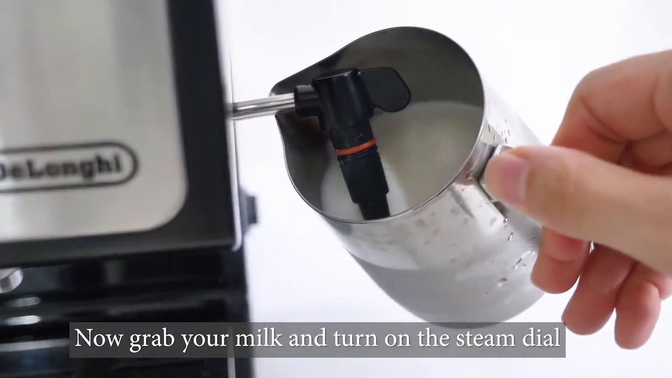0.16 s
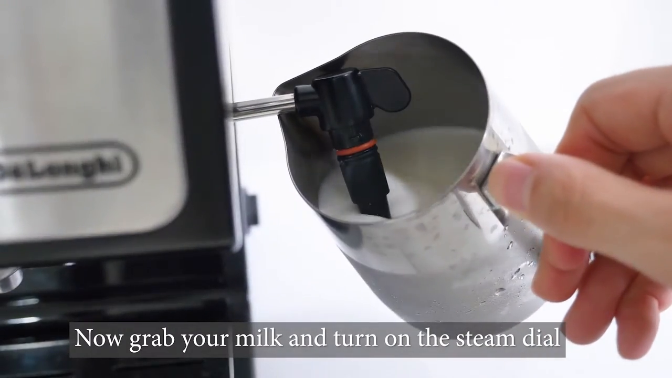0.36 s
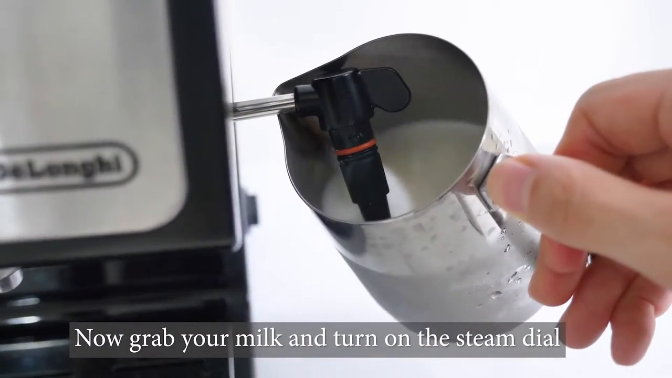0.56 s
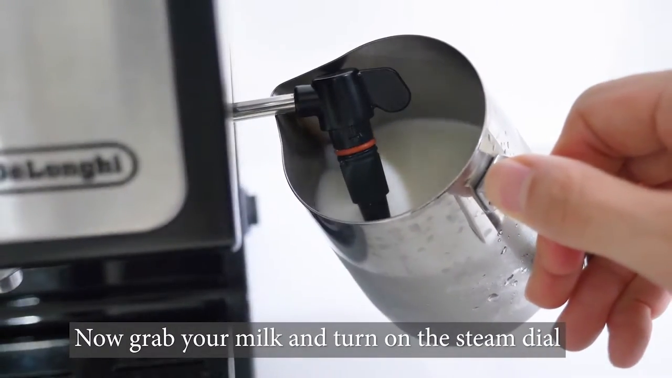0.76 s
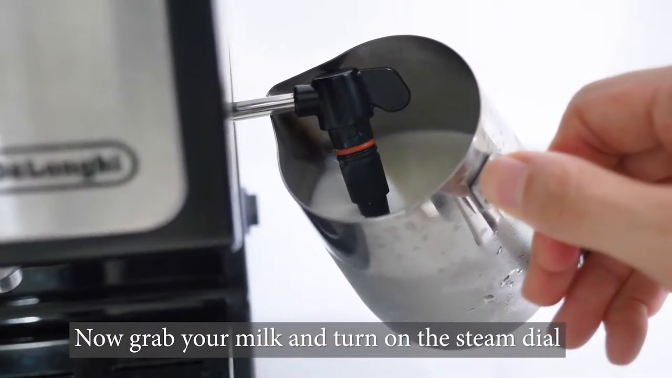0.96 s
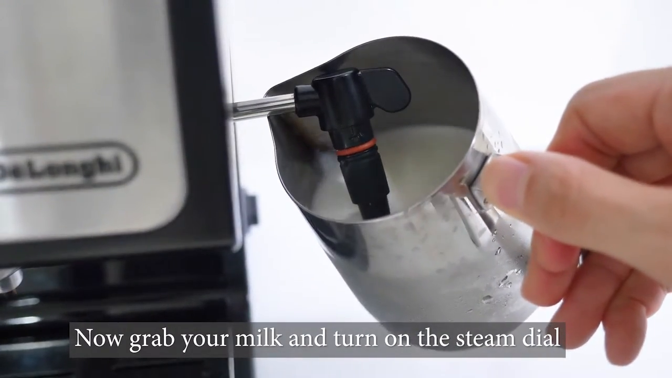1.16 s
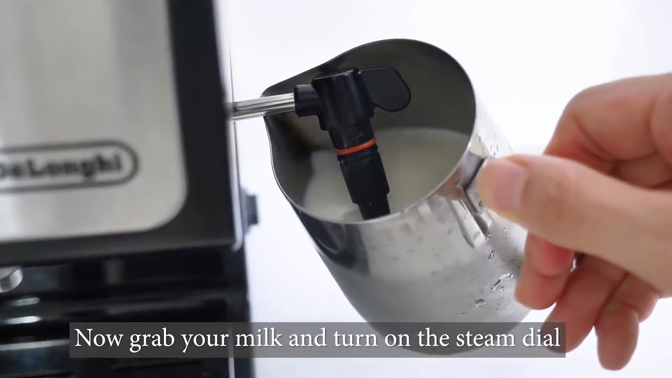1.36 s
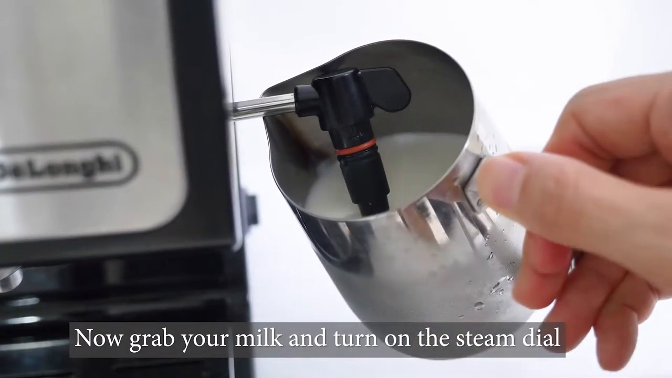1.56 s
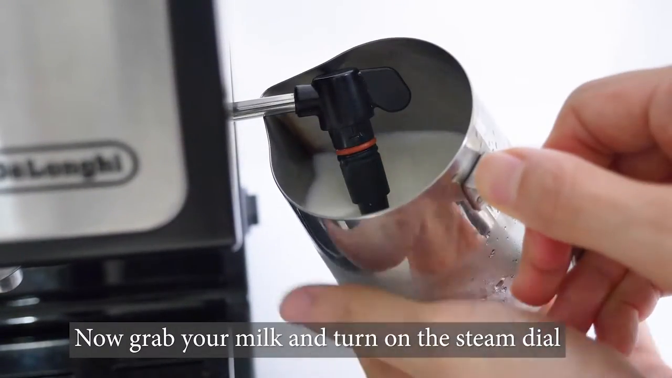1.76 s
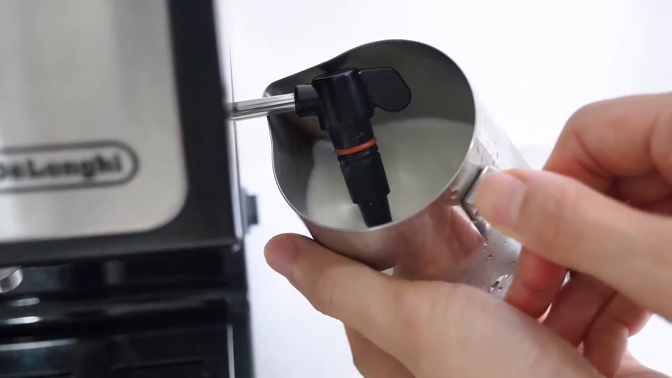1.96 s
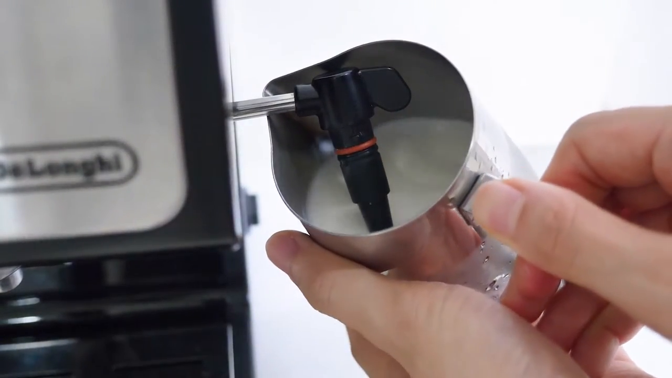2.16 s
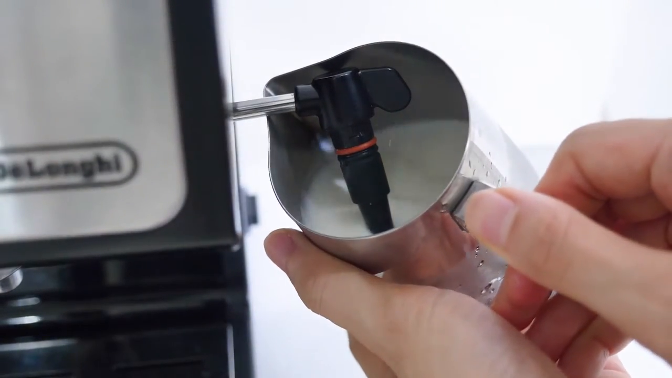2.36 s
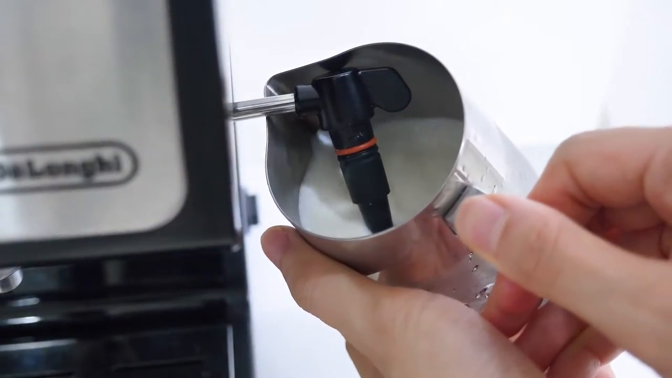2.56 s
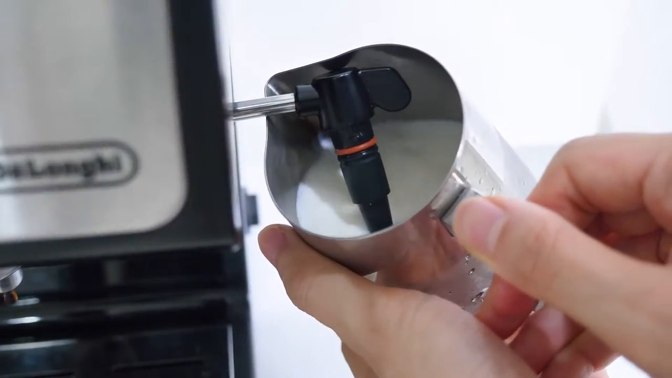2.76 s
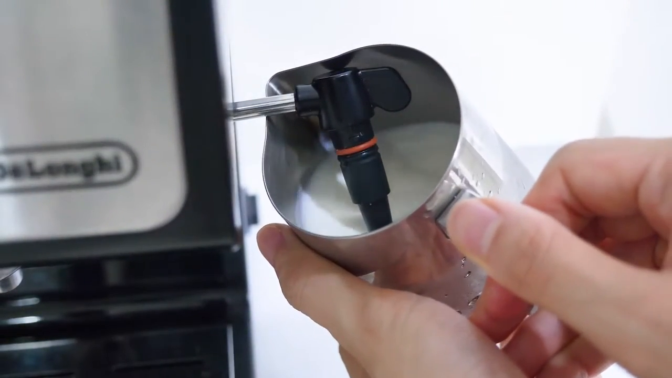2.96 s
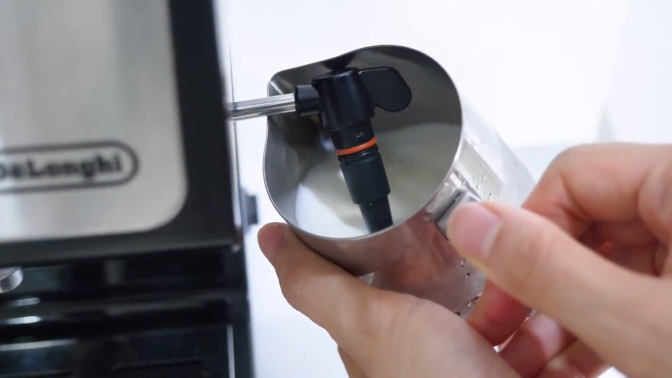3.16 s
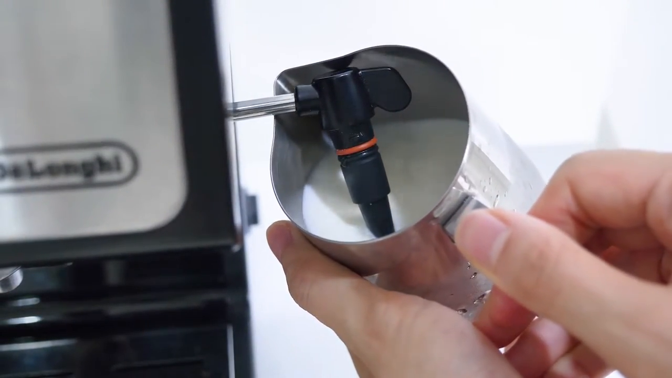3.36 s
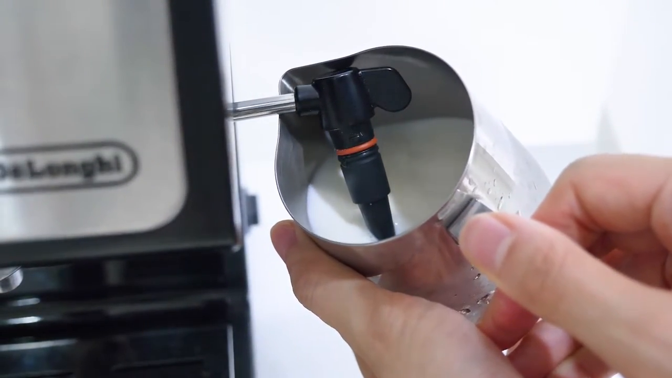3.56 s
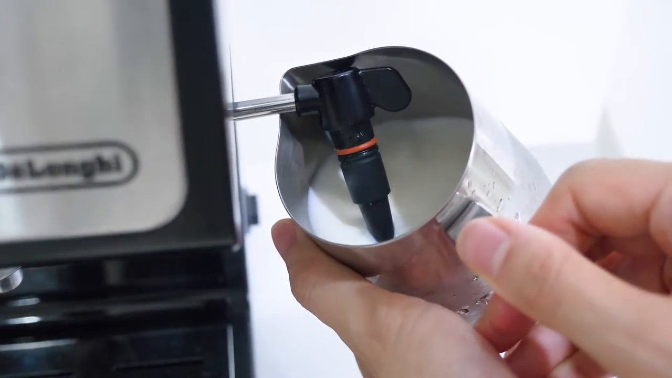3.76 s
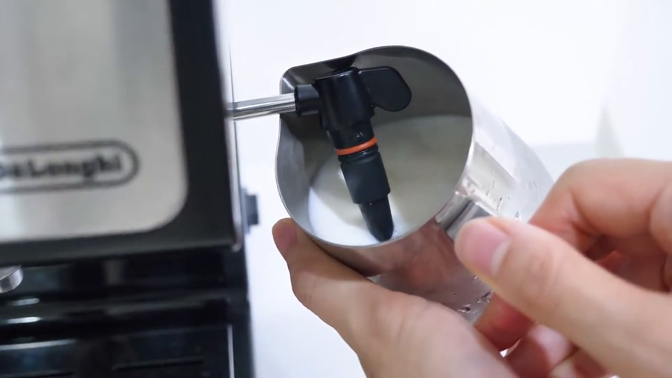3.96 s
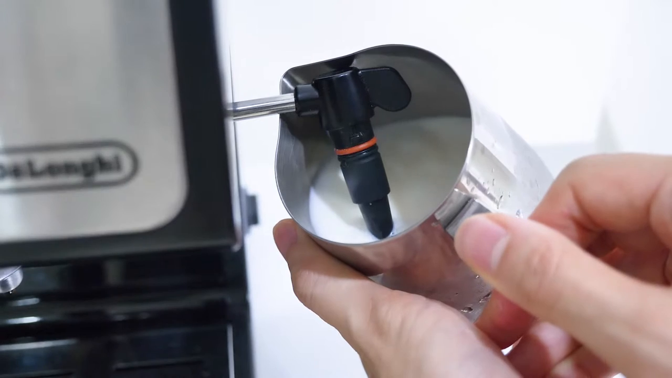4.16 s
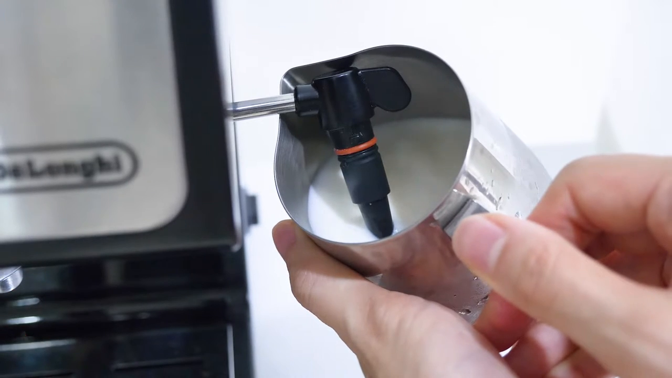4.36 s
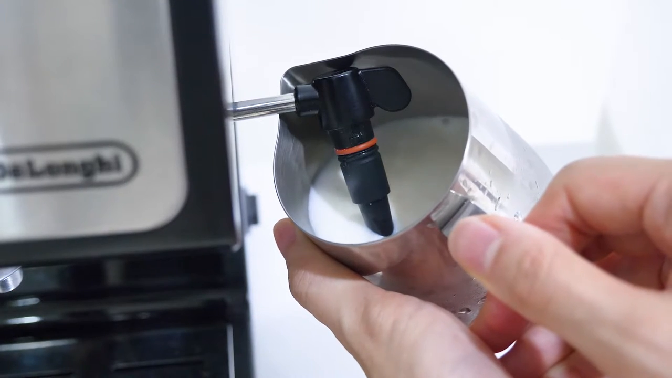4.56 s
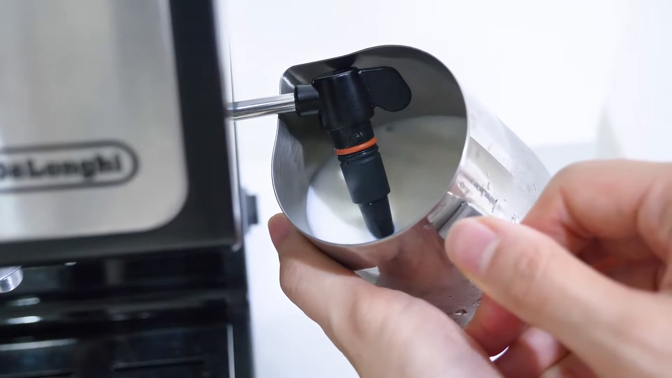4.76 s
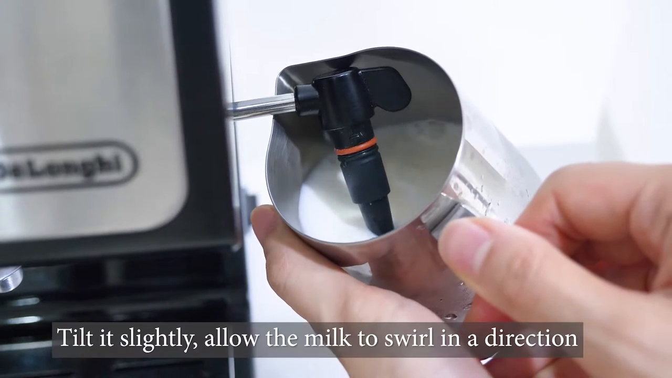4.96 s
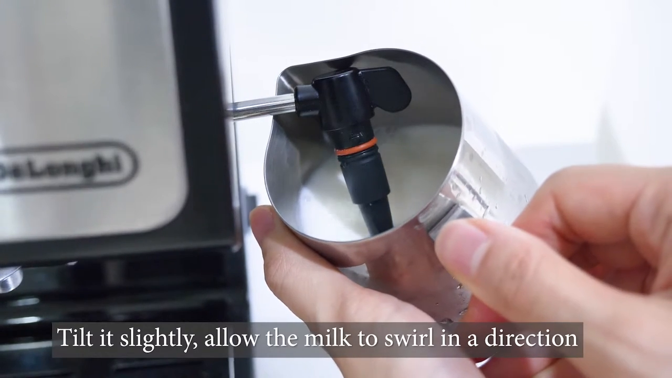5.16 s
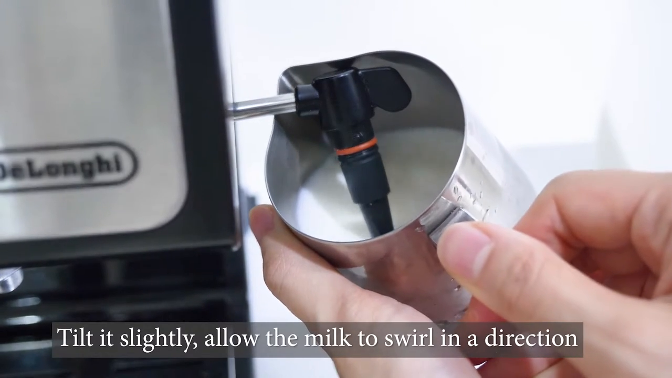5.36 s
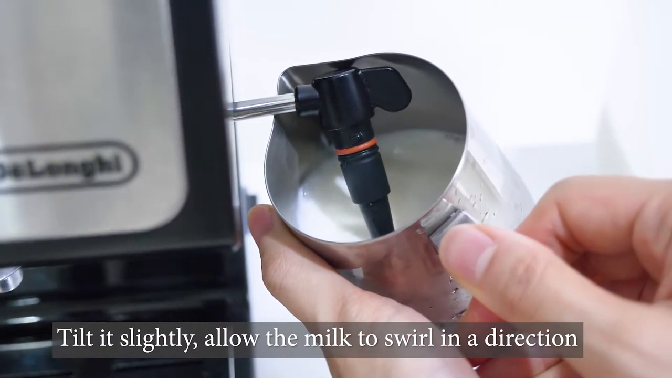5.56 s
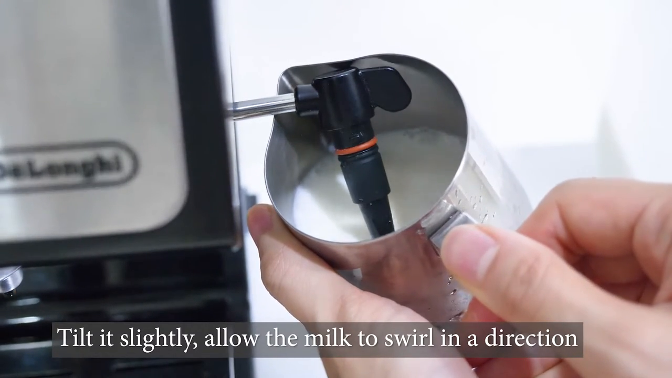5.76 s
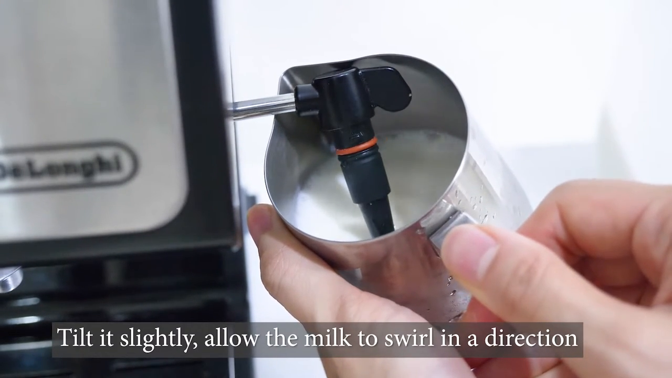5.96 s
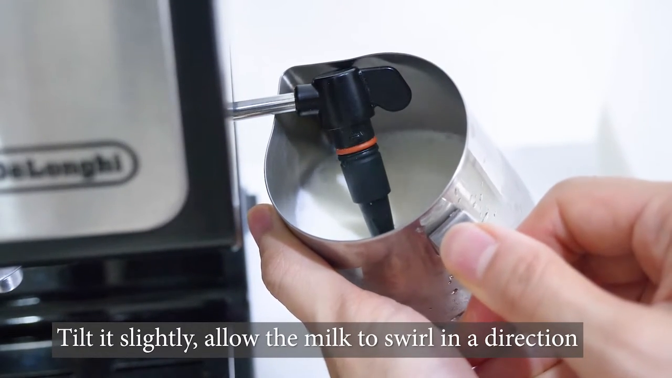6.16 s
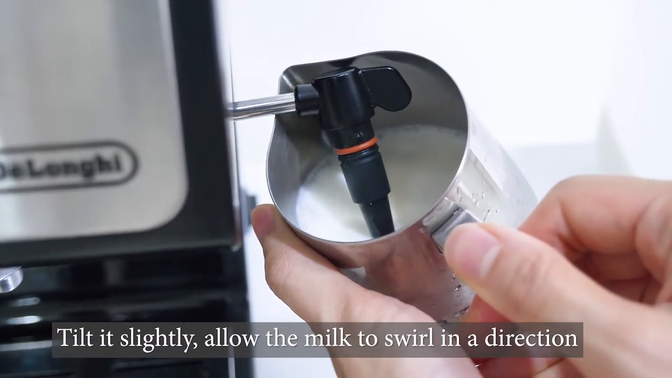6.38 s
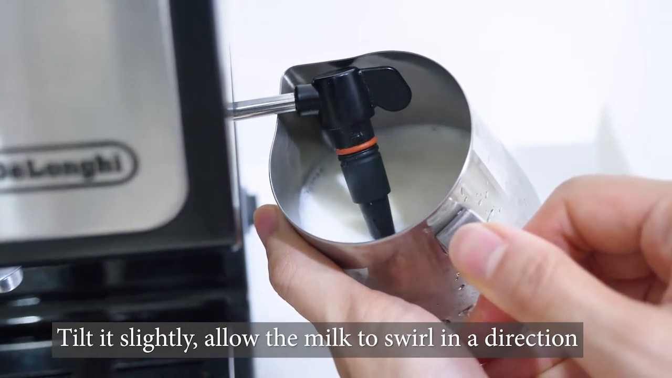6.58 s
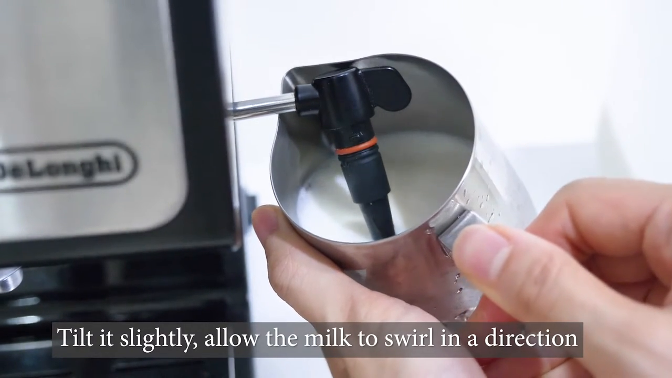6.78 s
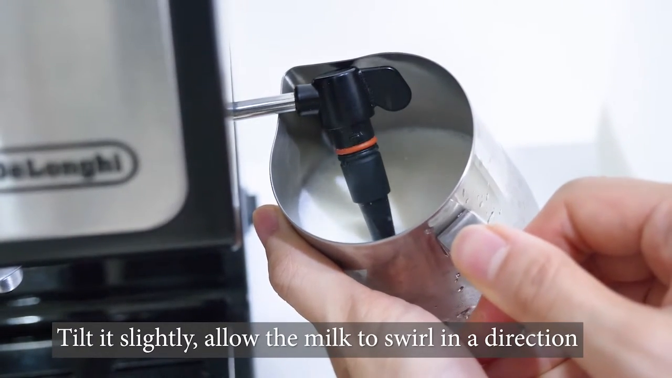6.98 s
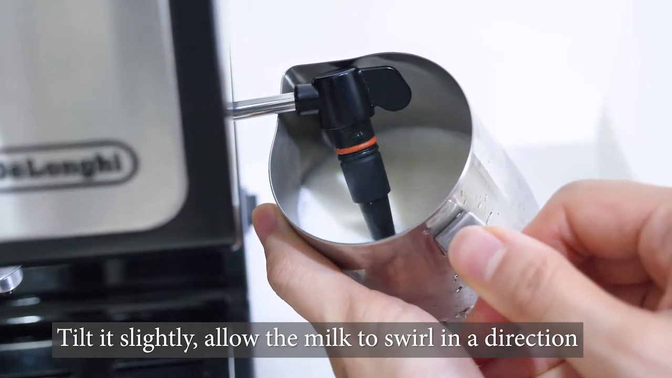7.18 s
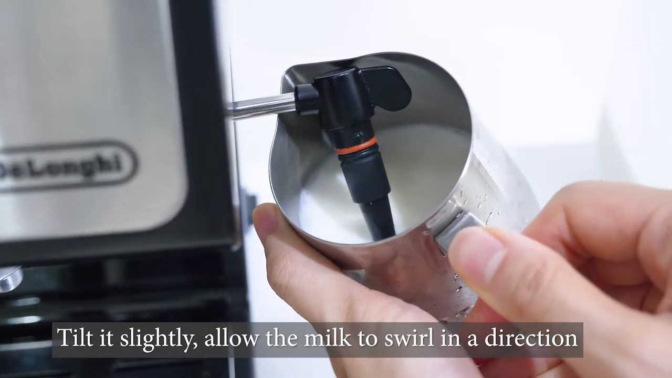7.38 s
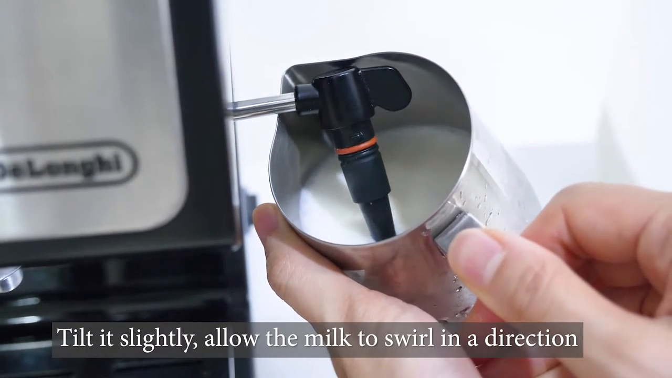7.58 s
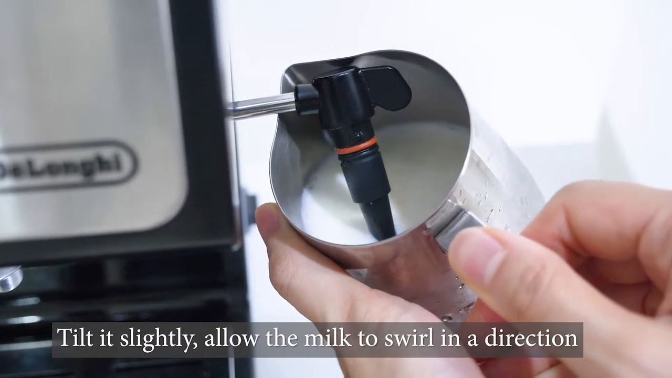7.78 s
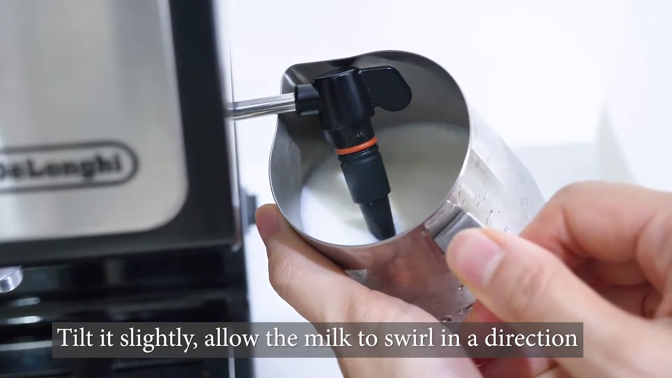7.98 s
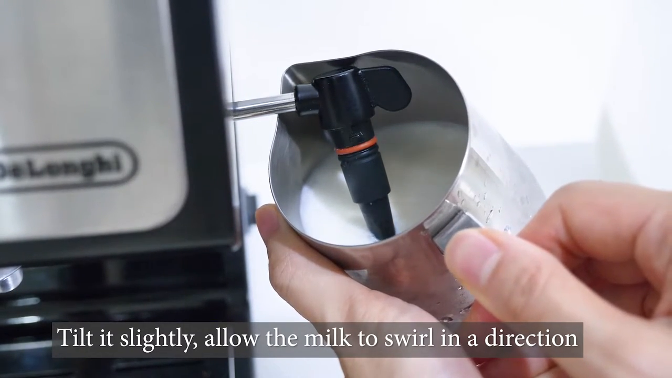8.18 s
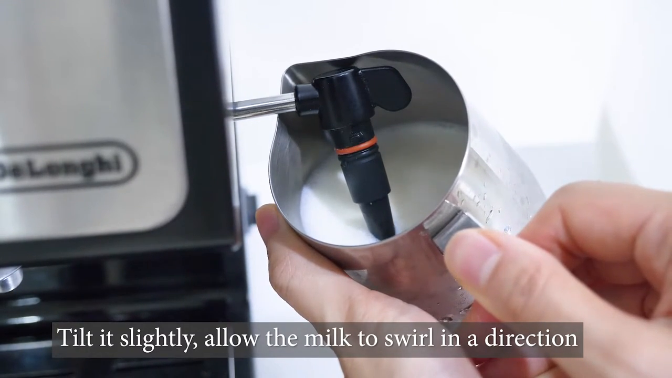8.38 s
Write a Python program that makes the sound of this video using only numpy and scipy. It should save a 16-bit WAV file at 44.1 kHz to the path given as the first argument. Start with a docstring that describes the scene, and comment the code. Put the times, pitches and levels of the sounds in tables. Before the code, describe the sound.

Close up in a small kitchen, a steel milk pitcher rubs softly in the hand and the wand ticks over low machine hum. Steam pockets crack and thud, quickening, until a loud tearing hiss starts at about one second. It sings with gliding tones, runs steadily, then briefly thins into bright spray and turns rougher, gurgling and chugging to the end.

```python
"""The steam wand of an espresso machine froths milk in a steel pitcher, close to the microphone in a small kitchen.
The jet is a loud, tearing hiss: noise and bubble clicks shaped by milk, pitcher and a gliding steam pocket.
Just before it, pockets of steam collapse with a crack and a thud, made of noise bursts and ringing sines.
Now and then the tip comes bare and sprays; later the pitcher is tilted, the tip rides shallower and the jet chugs.
Behind it: a rub of the pitcher, ticks of the wand, filtered-noise hum and a short diffuse room tail."""
import sys
import numpy as np
from scipy import signal
from scipy.fft import rfft, irfft, next_fast_len
from scipy.io import wavfile

SR = 44100
rng = np.random.default_rng(int(sys.argv[2]) if len(sys.argv) > 2 else 0)


def output_pcm(signal):
    """Save a mono or channel-first signal as 16-bit PCM at the path in sys.argv[1].

    Samples are clipped to [-1, 1] before scaling.
    """
    pcm = np.clip(np.atleast_2d(signal).T, -1, 1) * 32767
    wavfile.write(sys.argv[1], SR, np.round(pcm).astype(np.int16))


N = 371763
TIME = np.arange(N) / SR
JET_START = .957  # s
# how shallow the tip rides as the pitcher is tilted: (t/s, share 0-1)
SHALLOW = [(5.2, 0.06), (6.3, 0.75)]


def gain_of(db):
    """Decibels to amplitude."""
    return 10 ** (np.asarray(db) / 20)


def evened(x):
    """Scales to rms 1."""
    return x / np.sqrt(np.mean(x ** 2) + 1e-20)


def read(points, hz):
    """A spectrum, joined by straight lines over log frequency."""
    f, value = np.transpose(points)
    return np.interp(np.log(hz + 1), np.log(f + 1), value)


def follow(rows, t):
    """Each column of a curve at the times t."""
    s, *columns = np.transpose(rows)
    return [np.interp(t, s, c) for c in columns]


def add(mix, s, sound):
    """Mixes a sound in at time s."""
    part = mix[max(round(s * SR), 0):][:len(sound)]
    part += sound[:len(part)]


def hump(hz, centre, width):
    """Bell of one resonance, height 1."""
    return 1 / (1 + (2 * (hz - centre) / width) ** 2)


def noise(colour, size):
    """Noise of a given spectrum, rms 1."""
    shape = gain_of(read(colour, np.fft.rfftfreq(size, 1 / SR)))
    return evened(np.fft.irfft(rfft(rng.standard_normal(size)) * shape, size))


def wander(rate_hz):
    """Smooth chance up to about rate_hz, rms 1."""
    hz = np.fft.rfftfreq(N, 1 / SR)
    return evened(irfft(rfft(rng.standard_normal(N)) / (1 + (hz / rate_hz) ** 4) ** .5, N))


def flutter(depth_db, rate_hz):
    """A random gain of steady mean power."""
    depth = depth_db * np.log(10) / 20
    return np.exp(depth * wander(rate_hz) - depth ** 2)


def swirl(shape, bins, frames):
    """Random patches over frequency and time, rms 1."""
    patch = np.outer(np.hanning(bins), np.hanning(frames))
    return evened(signal.fftconvolve(rng.standard_normal(shape), patch, "same"))


def short_spectra(x):
    """Frequencies, frame times and short-time spectra."""
    return signal.stft(x, SR, nperseg=1024, noverlap=896)


def jet():
    """Large bubbles pop, the pocket chugs and small bubbles fizz; their common surge grows as the tip rides shallow."""
    shallow = np.clip(follow(SHALLOW, TIME)[0], 0, 1)
    surge = flutter(depth_db=0.26 + 0.35 * shallow, rate_hz=38)
    pops = evened(collapses(per_s=900, spread_db=1.5) + 0.94 * rng.standard_normal(N))

    chugging = np.clip(.1 + .15 * shallow + .11 * spurts(TIME)[0], 0, 1)
    bursts = evened(1 - chugging + chugging * chug(rate_hz=112, jitter=.35, decay=.42))
    boil = bursts * evened(collapses(per_s=4000, spread_db=0.5) + 0.46 * rng.standard_normal(N))

    fizz = evened(collapses(per_s=3500, spread_db=0.5) + 1.2 * rng.standard_normal(N))
    fizz = fizz * flutter(depth_db=0.79 + 1.4 * shallow, rate_hz=23)

    # pops fill the bass, boil the middle, fizz the treble; the shares of power add up to 1
    hz, t, z = short_spectra(np.array([pops, boil, fizz]) * surge)
    large = np.clip(read([(1700, 1), (2700, 0.02)], hz), 0, 1)[:, None]
    small = np.clip(read([(3800, 0.011), (5500, 1)], hz), 0, 1)[:, None]
    middle = np.clip(1 - large - small, 0, 1)
    drive = np.sqrt(large) * z[0] + np.sqrt(middle) * z[1] + np.sqrt(small) * z[2]

    # swirling foam opens and closes paths for the sound: patches in time and frequency
    swirl_db = 1.69 * swirl(drive.shape, bins=15, frames=31)
    ripple_db = read([(1500, 2.25), (3500, 0.99), (6000, 3.3), (12000, 3.15)], hz)[:, None]
    colour = jet_colour(hz, t) + swirl_db + ripple_db * fine_modes(hz, t)
    sound = signal.istft(drive * gain_of(colour), nperseg=1024, noverlap=896)[1][:N]
    return sound * np.clip((TIME - JET_START) / 0.0044, 0, 1)


def collapses(per_s, spread_db):
    """Clicks of imploding bubbles, most small and a few large, rms 1."""
    size = gain_of(spread_db * np.minimum(rng.exponential(1, N), 4))
    return evened(size * rng.choice([-1., 1.], N) * (rng.random(N) < per_s / SR))


def chug(rate_hz, jitter, decay):
    """The pocket collapses at an uneven rate; each collapse is a burst that decays over a share of its turn."""
    turns = np.cumsum(rate_hz * np.exp(jitter * wander(60))) / SR
    return evened(np.exp(-(turns % 1) / decay))


def jet_colour(hz, t):
    """Gain in dB (frequency x time) that milk, steam pocket and pitcher give to the jet."""
    # steam condensing in milk: (f/Hz, relative level/dB per Hz)
    boil_colour = [(210.0, -28.5), (300.0, -34), (520.0, -11.5), (660.0, -26.5), (820.0, -19),
                   (1000.0, -3.5), (1750.0, -7.5), (2700.0, 1.45), (3200.0, 4), (5500.0, -3.5),
                   (9500.0, -5), (13000.0, -19.5), (15500.0, -30.5)]
    # fine mist, heard at the very top: (t/s, level/dB)
    mist_level = [(1.25, 15), (2.2, 6), (2.75, 11), (3.2, 3.5), (4.4, 10), (6.05, 3), (6.7, -11),
                  (7.1, -1.5), (8.43, -5)]
    hz = hz[:, None]
    (mist,), (shallow,) = follow(mist_level, t), follow(SHALLOW, t)
    strength, gurgle, fizz = flow(t, shallow)
    # the smaller the bubble, the higher it sounds
    bubbles = gurgle * read([(1000, 1), (2600, 0)], hz)
    bubbles = bubbles + fizz * read([(3500, 0), (6500, 1)], hz)
    bubbles = bubbles + mist * read([(7000, 0), (14000, 1)], hz)
    # a spurt changes the band round 2950 Hz and the hiss above it
    throb, hiss = spurts(t)
    spurt = (throb - 1.34 * shallow) * hump(hz, 2950, 410) + hiss * read([(3200, 0.73), (4000, 1)], hz)
    no_bass = read([(40, -23), (200, -1)], hz)
    base_db = -18.5
    body = base_db + strength + read(boil_colour, hz) + pitcher_ring(hz, shallow) + bubbles + spurt
    return body + steam_pocket(hz, t, shallow) + spray(hz, t) + hollows(hz, t) + no_bass


def steam_pocket(hz, t, shallow):
    """The pocket at the tip sings in two gliding modes, in dB; a bare tip loses it and it takes a while to regrow."""
    # (t/s, resonance f/Hz, strength of the song/dB before gulps, baring and the factor below)
    song_curve = [(1.15, 1250, -2.5), (1.46, 1650, -9), (1.56, 1850, 13), (1.68, 2150, 13),
                  (1.93, 2450, 11), (2.02, 2900, 2), (2.15, 4250, 7.5), (2.32, 4030, 3.5),
                  (2.55, 2900, 2.5), (2.93, 2500, 10), (3.06, 2120, 16), (3.24, 2000, 2), (3.68, 2100, 1.5),
                  (3.78, 3100, 5), (4.7, 2520, 5), (5.1, 2540, 2), (5.3, 2150, 8.5), (5.6, 2300, 1)]
    width, second_ratio = 0.13, 2.27  # both as shares of the pocket's pitch
    pocket_hz, song = follow(song_curve, t)
    song = song + shallow * gulps(t) - 5.5 * barings(t, close_s=0.11)
    # the second mode rings most clearly while the jet opens
    second = (1 - shallow) * 1.5 + 7 * opening(t)
    return 1.04 * song * hump(hz / pocket_hz, 0.99, width) + second * hump(hz / pocket_hz, second_ratio, width)


def pitcher_ring(hz, shallow):
    """Air and wall resonances of the pitcher in dB, blended from the tip deep to the tip shallow."""
    # (f/Hz, width/Hz, level/dB with the tip deep, level/dB with the tip shallow)
    pitcher_modes = [(1065, 116, 3, 9), (1224, 104, 10.5, 7), (1444, 90, 10, 13.5), (1560, 88, 8, 12.5),
                     (1871, 65, 15, 8.5), (2098, 114, 8.5, 3.5), (2400, 86, -4.4, 2), (2470, 67, 12, 9),
                     (2640, 42, 1.5, 12.5), (2925, 161, 5.5, 13.5), (3074, 117, 11.5, 15),
                     (3325, 173, 9.5, 7.5), (3470, 73, -1, 11), (3567, 69, 9.5, 12.5), (3970, 136, 12, 6),
                     (4217, 117, 6.5, 10), (4446, 256, 1.5, 10.5), (4804, 220, 10.5, -3),
                     (5415, 170, 6, 13.5), (5830, 210, 2.5, 6.5), (6700, 180, 4, -4.5),
                     (7300, 114, 5.5, 1.5), (7770, 270, 3.2, -6.5), (8370, 560, 0.5, 8),
                     (8670, 450.0, 2.5, -5.5), (10100, 920, -1.3, 2.5), (12460, 500, 0.5, 4)]
    deep_ring = sum(db * hump(hz, f, width) for f, width, db, _ in pitcher_modes)
    shallow_ring = sum(db * hump(hz, f, width) for f, width, _, db in pitcher_modes)
    return (1 - shallow) * deep_ring + shallow * shallow_ring


def flow(t, shallow):
    """Strength of the jet, gurgle of large bubbles and fizz of small ones in dB, from opening, tilt and gulps."""
    spare, gulp = opening(t), gulps(t)
    strength = 0.5 - 3 * shallow + 3 * spare - 0.35 * gulp
    gurgle = -0.54 + 2.8 * shallow + gulp
    fizz = -0.26 + 3.5 * shallow - 7.5 * spare + 0.59 * gulp
    return strength, gurgle, fizz


def opening(t):
    """Spare pressure at the times t: 1 as the jet starts, then dying away."""
    settle_s = 0.48
    return np.exp(-np.maximum(t - JET_START, 0) / settle_s)


def gulps(t):
    """Lift of the large bubbles in dB at the times t; each gulp swells and fades evenly."""
    # one row a gulp: (middle t/s, half length/s, level/dB)
    gulp_rows = [(0.948, 0.019, 9), (1.124, 0.061, 15.5), (2.667, 0.2, 2), (3.0, 0.23, 2.5),
                 (6.263, 0.18, 6), (7.195, .11, 3.5), (7.594, 0.089, 5.5), (8.166, 0.1, 9.5),
                 (8.42, 0.095, 9.5)]
    return sum(db * np.exp(-((t - middle) / half) ** 2) for middle, half, db in gulp_rows)


def spurts(t):
    """Throb and hiss of the spurts in dB at the times t; each builds up and breaks off within milliseconds."""
    # one row a spurt: (start t/s, end t/s, throb level/dB, hiss level/dB)
    spurt_rows = [(0.958, 0.986, 0.5, 3), (1.156, 1.254, 2, 0), (6.065, 6.128, 0, -1),
                  (6.185, 6.228, 7.5, -0.5), (6.28, 6.31, 12, -3), (6.577, 6.685, 2.5, 0),
                  (6.725, 6.74, -7, 3), (6.742, 6.812, 8.5, -1), (6.89, 6.948, 4, 0.5), (7.005, 7.09, 0, 0),
                  (7.473, 7.539, 12, -2.5), (7.638, 7.69, 2, 1), (7.77, 7.793, 2, -2),
                  (7.84, 7.947, 3.5, 0), (8.004, 8.028, 7, 1), (8.249, 8.278, 6, 2), (8.404, 8.45, 14, -2)]
    rise_s, fall_s = 0.0051, 0.0078
    gates = np.array([np.clip(np.minimum((t - start) / rise_s, (end - t) / fall_s), 0, 1)
                      for start, end, _, _ in spurt_rows])
    return np.transpose(spurt_rows)[2:] @ gates


def barings(t, close_s):
    """Share of the tip that is bare at the times t: the milk falls away fast and closes exponentially."""
    # one row a baring: (start t/s, hold after the start/s, share 0-1)
    baring_rows = [(0.984, .04, 0.56), (1.1, 0.025, 0.02), (5.484, 0.056, 0.7), (5.788, 0.099, 1),
                   (6.958, 0.032, 0.3), (7.372, 0.043, .92)]
    attack_s = 0.006
    return sum(share * np.clip((t - start) / attack_s, 0, 1) * np.exp(-np.maximum(t - start - hold, 0) / close_s)
               for start, hold, share in baring_rows)


def spray(hz, t):
    """Change of colour in dB while the tip is bare: thinner, brighter, with whistles of the nozzle."""
    # change of colour with the tip fully bare: (f/Hz, level/dB)
    bare_colour = [(300, -11), (1500, -4.5), (1850, -11), (2650, -19.5), (3200, -6.5), (5000, -2),
                   (8000, 4.5), (10000, 5.5), (14000, 20)]
    # whistles of the bare nozzle: (f/Hz, width/Hz, level/dB)
    whistles = [(8820, 240, 8.6), (10320, 350, 8.2), (11550, 440, 6), (13500, 330, 8)]
    whistle_db = sum(db * hump(hz, f, width) for f, width, db in whistles)
    return barings(t, close_s=0.047) * (read(bare_colour, hz) + whistle_db)


def hollows(hz, t):
    """Dips in dB (frequency x time) that fade in and out of the hiss."""
    # one row each time the hiss turns hollow: (start t/s, length/s, centre f/Hz, depth/dB)
    hollow_rows = [(1.12, 0.65, 7500, -6), (2.12, 0.49, 2200, -6.5), (2.24, .1, 2580, -14),
                   (3.705, 0.46, 2400, -4.5), (5.158, 0.32, 2600, -4), (5.8, 0.19, 2200, -6),
                   (6.58, 0.4, 2180, -4.5)]
    width, fade_s = .18, 0.031  # width as a share of the centre
    return sum(db * hump(hz / centre, 1, width)
               * np.clip(np.minimum(t - start, start + length - t) / fade_s, 0, 1)
               for start, length, centre, db in hollow_rows)


def fine_modes(hz, t):
    """Crowded fine modes (frequency x time): those of the steel stay, those of the foaming milk come and go."""
    steel = evened(np.convolve(rng.standard_normal(len(hz)), np.hanning(6), "same"))
    milk = swirl((len(hz), len(t)), bins=9, frames=121)
    foaming = np.clip(.8 - .3 * follow(SHALLOW, t)[0], 0, 1)
    return np.sqrt(1 - foaming) * steel[:, None] + np.sqrt(foaming) * milk


def sputters(crack_db=-1, ring_db=1, splash_db=2, splash_t60=0.1, lag=.0035):
    """A steam pocket cracks shut; a moment later (lag in s) the milk rebounds and the pitcher booms."""
    # one row a sputter: (t/s, crack level/dB and thud level/dB before the offsets, pitch factor on the thud)
    sputter_rows = [(.5367, -23.5, -22, 1.0), (0.6457, -21, -21, 1.05), (0.7495, -16, -20, 0.88),
                    (.7736, -21, -20.5, .99), (0.7952, -24, -21, 1.0), (0.8653, -17, -18.5, 1.0),
                    (.8979, -11, -19.5, 1.3), (0.903, -26, -15, .68), (.9160, -17, -15.5, 1.44),
                    (0.9421, -20, -22, 0.8), (0.9453, -15, -18.5, 1.0)]
    # milk and pitcher ringing after a sputter: (f/Hz before the pitch factor, relative level/dB, t60/s)
    thud_modes = [(289, -18, 0.23), (439, -2.5, 0.23), (609, -3, 0.29), (840, -19, 0.066), (1020, -4, 0.12),
                  (1180, -16, .17), (1460, -24, .11), (1940, -15, 0.39), (2280, -13, .08)]
    # spectrum of the splash: (f/Hz before the pitch factor, relative level/dB per Hz)
    splash_colour = [(30, -75), (100, -38), (250, -20), (450, 2), (1100, 3.5), (2000, -11.5), (3200, -20),
                     (9000, -25.5), (16000, -42)]
    out, t = np.zeros(N), TIME[:16384]
    for s, snap_db, thud_db, pitch in sputter_rows:
        ring = sum(gain_of(db - 60 * t / t60) * np.sin(2 * np.pi * (hz * pitch * t + rng.random()))
                   for hz, db, t60 in thud_modes)
        splash = noise([(hz * pitch, db) for hz, db in splash_colour], len(t)) * gain_of(-60 * t / splash_t60)
        thud = gain_of(ring_db - 5.5) * ring + gain_of(splash_db) * splash
        thud = thud * np.minimum(t / 0.00073, 1)
        add(out, s, gain_of(snap_db + crack_db) * crack(t60=0.01))
        add(out, s + lag, gain_of(thud_db) * thud)
    return out


def crack(t60):
    """A bright snap of noise that lasts a few milliseconds and stops short."""
    # (f/Hz, relative level/dB per Hz)
    crack_colour = [(30, -60), (200, -6), (1200, 10), (2400, 6), (3400, 3), (5000, 3), (9800, 5.5),
                    (12500, -12), (16000, -12)]
    t = TIME[:2048]
    return noise(crack_colour, len(t)) * np.minimum(t / .0006, 1) * gain_of(-60 * (t / t60) ** 1.5)


def handling():
    """The pitcher rubs in the hand and the wand ticks; both set the steel wall ringing."""
    # the pitcher slides in the hand: (t/s, level/dB before the wall)
    rub_level = [(0, -37.5), (.06, -42), (.1, -47), (.16, -53), (.195, -43), (.23, -66), (.3, -88)]
    # spectrum of the rub: (f/Hz, relative level/dB per Hz)
    rub_colour = [(300, -13), (900, 12.5), (2000, 3), (2800, -11), (5000, -4), (10000, -15), (15000, -29)]
    # small ticks of the warm wand: (t/s, level/dB before the wall)
    tick_rows = [(.0554, -53), (.3367, -54), (.3751, -45)]
    # resonances of the steel wall: (f/Hz, width/Hz, level/dB before the offset)
    steel_modes = [(3110, 160, 19), (3970, 140, 8), (4900, 220, 8), (5400, 150, 2), (6900, 150, 9),
                   (7400, 150, 7), (8100, 180, 9), (9600, 400, 7)]
    out = noise(rub_colour, N) * gain_of(follow(rub_level, TIME)[0])
    for s, db in tick_rows:
        add(out, s, gain_of(db) * crack(t60=.015))
    hz = np.fft.rfftfreq(N, 1 / SR)
    wall_db = sum(db * hump(hz, f, width) for f, width, db in steel_modes) - 4.0
    return irfft(rfft(out) * gain_of(wall_db), N)


def hum():
    """Low noise of machine and room over a faint steady rumble; it sits lower under the steam."""
    # (f/Hz, relative level/dB per Hz)
    hum_colour = [(30, -60), (60, -32), (80, -18), (100, 0), (125, 0.5), (220, -12.5), (295, 1), (360, -1),
                  (435, 2), (530, -6.5), (780, -4), (1500, -12), (4000, -30.5), (16000, -38)]
    # (t/s, level/dB)
    hum_level = [(0, -43.5), (.9, -37.5), (1.0, -46), (2, -50), (5.5, -54.5), (6.2, -51.5), (7.6, -51.5),
                 (8.43, -47)]
    rumble = gain_of(-77) * noise([(15, -22), (50, -4), (90, 2), (200, -15), (1000, -60)], N)
    return noise(hum_colour, N) * gain_of(follow(hum_level, TIME)[0]) + rumble


def kitchen(x):
    """A short diffuse tail of decaying noise, different at each ear and weak in the bass."""
    # decay of the room: (f/Hz, t60/s)
    room_decay = [(200, 0.1), (1000, 0.42), (4000, 0.15), (14000, 0.25)]
    hz, t, z = signal.stft(rng.standard_normal((2, SR // 2)), SR, nperseg=256)
    z = z * gain_of(-60 * t / read(room_decay, hz)[:, None])
    tail = signal.istft(z, SR, nperseg=256)[1]
    tail = tail / np.linalg.norm(tail[0])
    size = next_fast_len(N + SR)
    # level of the tail: (f/Hz, level/dB)
    wet_db = [(100, -42), (200, -32), (300, -26), (600, -15.0), (1100, -10.5), (2500, -13.0),
              (4500, -8.5), (8000, -24.5), (13000, -12)]
    wet = gain_of(read(wet_db, np.fft.rfftfreq(size, 1 / SR)))
    return irfft(rfft(x, size) * rfft(tail, size) * wet, size)[:, :N]


def scene():
    """The pitcher sounds just right of the middle, its sputters without deep bass; the hum lies in the middle."""
    no_deep_bass = signal.butter(3, 150, "highpass", fs=SR, output="sos")
    knocks = signal.sosfilt(no_deep_bass, sputters())
    pitcher = jet() + knocks + handling()
    machine = hum()
    left_right_db = [[-.5], [.25]]
    return pitcher * gain_of(left_right_db) + machine + kitchen(pitcher + machine)


def record(dry):
    """The upper band limit of the recorder, a steep low-pass at 16 kHz."""
    low_pass = signal.firwin(511, 16000, window=("kaiser", 9), fs=SR)
    return signal.oaconvolve(dry, low_pass[None], "same")


dry = scene()
out = record(dry)
output_pcm(out)
```